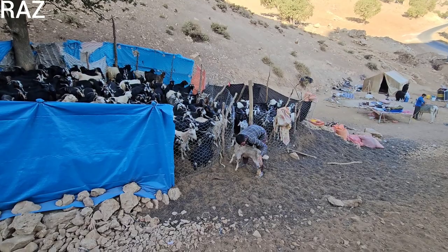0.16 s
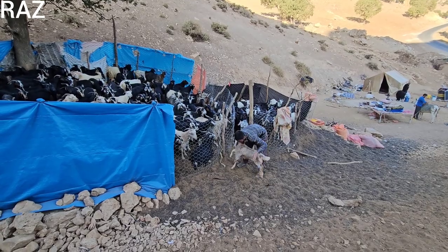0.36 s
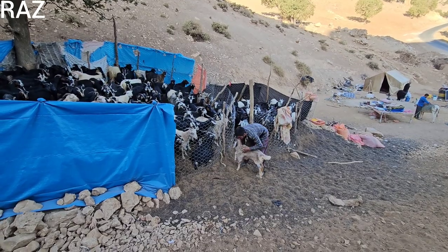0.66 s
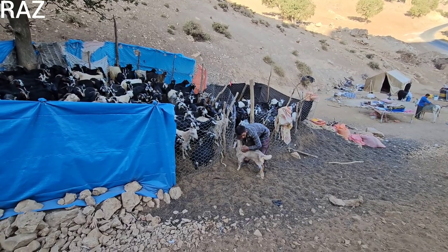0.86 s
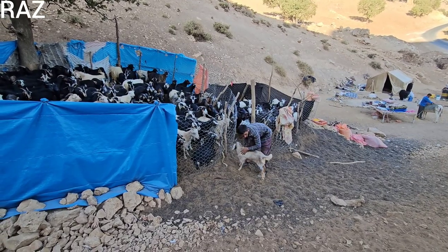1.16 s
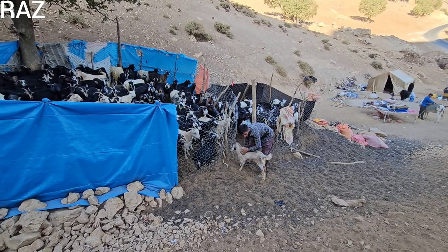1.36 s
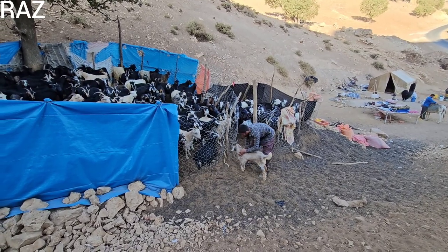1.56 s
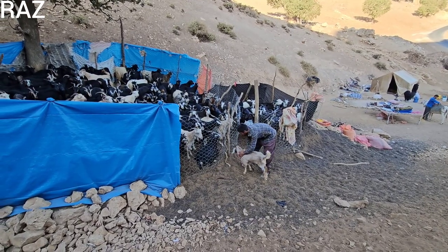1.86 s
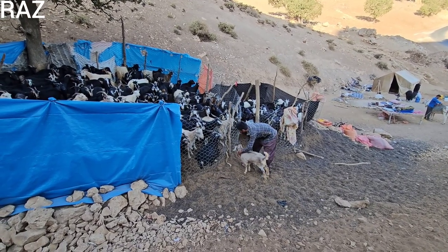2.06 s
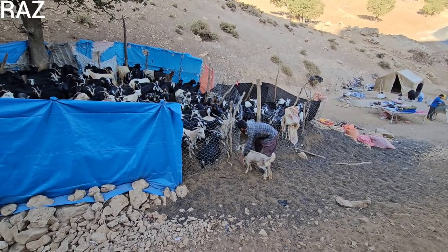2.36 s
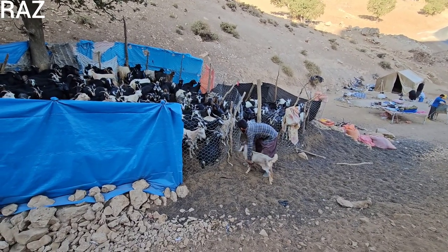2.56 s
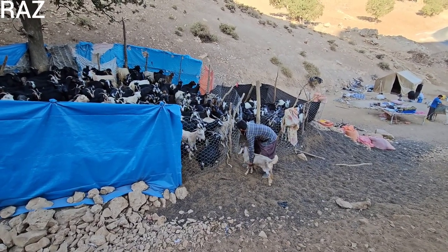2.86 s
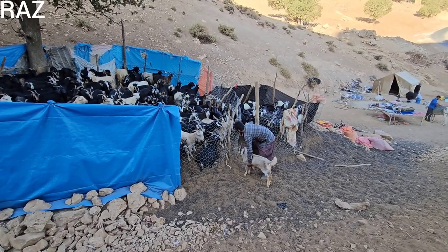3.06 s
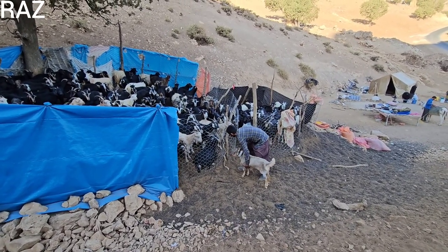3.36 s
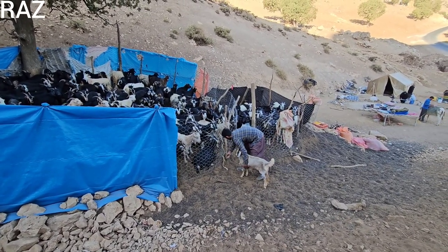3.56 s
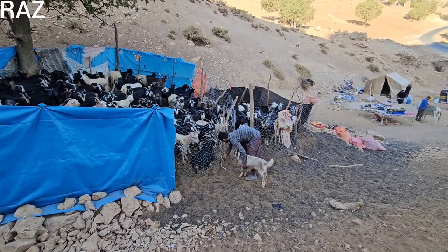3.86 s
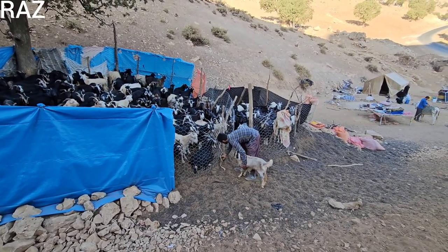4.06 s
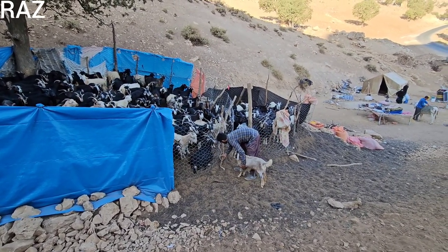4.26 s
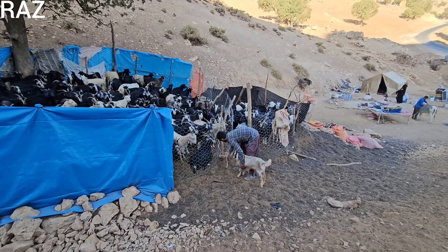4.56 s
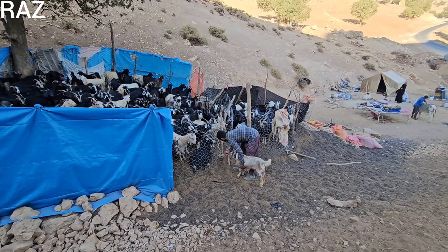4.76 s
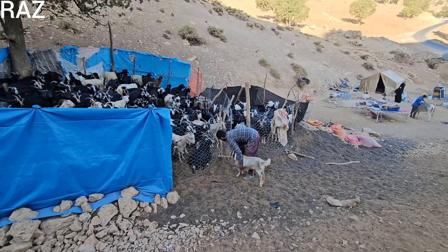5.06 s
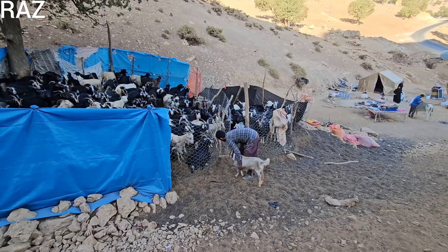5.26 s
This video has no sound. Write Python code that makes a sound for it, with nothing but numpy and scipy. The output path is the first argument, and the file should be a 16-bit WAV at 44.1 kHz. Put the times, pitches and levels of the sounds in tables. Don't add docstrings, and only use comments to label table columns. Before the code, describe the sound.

Outdoor goat pen with low wind rumble: kid bleats briefly then at length, hooves and stones clatter, small bells tinkle, one hoarse bark rings out.

```python
import sys
import numpy as np
from scipy import signal
from scipy.fft import rfft, irfft, next_fast_len
from scipy.io import wavfile
from scipy.ndimage import uniform_filter1d

SR = 44100
rng = np.random.default_rng(int(sys.argv[2]) if len(sys.argv) > 2 else 0)


def transcribe(signal):
    frames = np.atleast_2d(signal).T
    limited = np.clip(frames, -1, 1)
    pcm = np.round(limited * 32767).astype(np.int16)
    wavfile.write(sys.argv[1], SR, pcm)


def rack_gain(trim_db):
    fader = np.asarray(trim_db, float)
    return 10 ** (fader / 20)


N = 237950
T = np.arange(N) / SR
HZ = np.arange(next_fast_len(N) // 2 + 1) * SR / next_fast_len(N)
RIGHT_S, LEFT_S = 0.0003095, -0.00014
LIPS_PART = 0.58


def unit(x):
    return x / np.sqrt(np.mean(x ** 2))


def shape(points, hz):
    f, db = np.transpose(points)
    return np.interp(np.log(hz + 1), np.log(f), db, left=-99, right=-99)


def tint(x, points):
    size = next_fast_len(N)
    return unit(irfft(rfft(x, size) * rack_gain(shape(points, HZ)), size)[:N])


def noise(points):
    return tint(rng.standard_normal(N), points)


def curves(tables, column):
    out = np.full(N, -140.)
    for rows in map(np.array, tables):
        inside = (T >= rows[0, 0]) & (T <= rows[-1, 0])
        out[inside] = np.interp(T[inside], rows[:, 0], rows[:, column])
    return uniform_filter1d(out, size=90)


def walk(rate, size=N):
    k = int(SR / rate)
    held = np.repeat(rng.standard_normal(size // k + 1), k)
    return 1.5 * uniform_filter1d(uniform_filter1d(held, k), k)[:size]


def wobble(hz, depth, rate):
    return np.sin(2 * np.pi * np.cumsum(hz * (1 + depth * walk(rate))) / SR)


def place(x, lag_s, pan_db=0.):
    size = next_fast_len(N)
    late = irfft(rfft(x, size) * np.exp(-2j * np.pi * HZ * lag_s), size)[:N]
    return np.array([late * rack_gain(pan_db / 2), x * rack_gain(-pan_db / 2)])


def ring(hz, t60, size=6000):
    t = T[:size]
    return np.sin(2 * np.pi * hz * t) * 1000. ** (-t / t60)


def add(track, s, sound):
    i = int(s * SR)
    track[..., i:i + sound.shape[-1]] += sound[..., :N - i]


def swells(rows, over):
    power = 0
    for s, half, db, *rel in rows:
        fall = 9 * np.abs((T - s) / half) ** 1.97
        power = power + rack_gain(2 * (db + over * sum(rel) - fall))
    return np.sqrt(power)


def wind():
    # (time [s], level [dB])
    gust_levels = [(0., -59.5), (.19, -48), (.3, -53.5), (.37, -40), (.52, -56), (.6, -42.5), (1.1, -52.5),
                   (1.85, -42), (2., -50.5), (2.07, -42.5), (2.25, -51), (2.61, -54.5), (3.71, -51.5),
                   (4., -57), (4.16, -46.5), (4.26, -51.5), (4.72, -55), (5.4, -56.5)]
    # (frequency [Hz], level per Hz [dB])
    rumble = [(8.8, -36), (15, -6), (38, 1.5), (70, 2), (88, -3), (119, -20), (200, -35), (260, -68),
              (440, -120)]
    air_colour = [(180, -19.5), (300, -23), (418, -8), (722, -6.5), (1010, -23), (1350, -13.5),
                  (1650, -25.5), (2900, -22), (8110, -39.5), (10200, -48.5), (15700, -33.5)]
    # (time [s], half length [s], level [dB])
    shoves = [
        (.17, 0.14, -69.5),
        (1.05, 0.038, -69.5),
        (1.3, 0.022, -65),
        (2.5, 0.11, -72),
        (3.85, 0.21, -68.5),
        (2.78, 0.16, -58.5),
        (3.05, 0.52, -75),
        (4.41, 0.093, -56),
        (5.2, 0.23, -62),
    ]
    gust = place(noise(rumble), RIGHT_S, -4.0) + 0.38 * np.array([noise(rumble), noise(rumble)])
    gust_db = curves([gust_levels], column=1) + 2.5 * walk(7.)
    herd = [(100, 0.5), (150, -6.5), (260, 2.5), (340, -7.5), (420, -26.5)]
    stir = place(noise(herd) * rack_gain(2. * walk(9.7)), 0.) + 0.5 * np.array([noise(herd), noise(herd)])
    tread = np.hypot(rack_gain(-75), swells(shoves, over=0))
    air = 0.23 * place(noise(air_colour), RIGHT_S) + 0.46 * np.array([noise(air_colour), noise(air_colour)])
    return rack_gain(gust_db) * gust + tread * stir + rack_gain(-70.5 + 0.36 * walk(0.92)) * air


def rustle(lag_s, like):
    # (time [s], half length [s], hiss level [dB], sizzle over hiss [dB])
    sheeting = [(.48, 0.038, -77, -15), (2.11, 0.086, -77.5, -11), (2.57, 0.071, -74, -14),
                (2.67, 0.056, -69.5, -10.5), (2.713, 0.01, -55.5, -8.5), (2.775, 0.061, -57.5, -10.5),
                (2.86, 0.078, -75, -12), (3.2, 0.1, -79, -31), (3.4, 0.28, -72, -11.5),
                (3.65, 0.1, -80, -40), (3.96, 0.101, -77.5, -6.5), (4.16, 0.15, -77, -4),
                (4.5, 0.12, -82, -21), (4.94, 0.058, -78, -12), (5.1, 0.15, -70.5, -1.5),
                (5.26, .07, -72, -8.5)]
    # (time [s], half length [s], scrape level [dB], body over scrape [dB])
    scuffs = [(.45, 0.023, -78, -27), (2.05, 0.018, -87, 18), (2.13, 0.053, -75.5, -20),
              (2.6, 0.1, -77, 12.5), (2.66, 0.047, -66.5, -1), (2.755, 0.058, -56.5, 3.5),
              (2.9, 0.095, -80, 7), (3.35, 0.39, -90.5, 7), (3.67, 0.1, -81.5, 5), (3.97, 0.1, -76.5, -8),
              (4.15, 0.27, -74.5, -24.5), (4.37, 0.013, -81, 28.5), (4.49, 0.09, -75.5, 22.5),
              (4.7, 0.12, -72.5, -6), (5.08, 0.27, -76, -1), (5.265, 0.045, -60.5, 0.5)]
    # (frequency [Hz], level per Hz [dB])
    sizzle = [(7500, -21), (8500, 1.5), (10300, 2.5), (11800, 7.5), (16000, -3.5)]
    hiss = [(1530, -39.5), (2600, -17), (2900, -0.5), (3750, -4.5), (4330, 0), (8500, -7.5), (11000, -38),
            (18700, -120)]
    pen_db = [-92.5, -85, -83, -86]
    scrape = [(900, -4.5), (1300, 3.5), (2600, 4.0), (3800, -6.5)]
    body = [(150, -15.5), (400, -6.0), (800, 2.0), (1300, -22.5)]
    moves = [swells(sheeting, over=1), swells(sheeting, over=0), swells(scuffs, over=0), swells(scuffs, over=0.89)]
    calm_db = -6 * (T < 0.57)
    out = 0
    for k, colour in enumerate([sizzle, hiss, scrape, body]):
        grains = [rng.standard_normal(N) * rack_gain(2.4 * walk(60) + 3.6 * walk(400)) for _ in range(3)]
        shared, left, right = (tint(g, colour) for g in grains)
        share = np.clip(like * (1 + 1.11 * k), 0, 1)
        both = np.sqrt(share) * place(shared, lag_s) + np.sqrt(1 - share) * np.array([left, right])
        out = out + np.hypot(moves[k], rack_gain(pen_db[k] + calm_db)) * both
    return out


def clicks():
    # (time [s], peak level [dB], ring [Hz], treble level [dB], left minus right [dB])
    gravel = [(0.4556, -54.5, 4450, -83, 7.5), (0.479, -64, 1960, -63, -2), (.24, -70, 1510, -86.5, 3),
              (0.996, -71, 2510, -95, -2), (1.585, -63, 4410, -96, -9), (4.57, -82.5, 6500, -87, 6),
              (1.3402, -60.5, 2660, -79, -6), (2.0835, -67, 1215, -88, 5), (2.1339, -49.5, 5230, -84, 9.5),
              (2.5251, -53.5, 3610, -56, 6.5), (2.627, -56, 2160, -64, 12), (2.6887, -59.5, 5000, -64, 3),
              (2.7057, -42.5, 3060, -46, 8.5), (2.791, -67, 5440, -77, 16), (2.83, -50.5, 1337, -59, 10),
              (2.8659, -62.5, 4000, -74, 4.5), (3.0244, -73, 1230, -72, 5.5),
              (3.1275, -69.5, 1260, -67.5, -5), (3.338, -65, 6500, -60, 4), (3.43, -64.5, 6550, -66, -1),
              (3.5859, -52.5, 2740, -126, 1.5), (3.705, -62.5, 3900, -75.5, 5.5),
              (4.109, -60, 2720, -70.5, 8), (5.0602, -65, 4230, -76, 5.5), (5.1284, -47, 4320, -65, 10.5),
              (5.266, -58.5, 4500, -68, 9), (5.375, -62, 1540, -65, 11)]
    out, t = np.zeros((2, N)), T[:4000]
    high = signal.butter(2, [5000, 11500], "band", fs=SR, output="sos")
    decay = (np.exp(-t / 0.0052) + 0.22 * np.exp(-t / 0.029)) * np.minimum(t / .0007, 1)
    for s, db, hz, treble_db, pan_db in gravel:
        burst = rng.standard_normal((2, len(t))) * decay
        burst[1] = .5 * np.roll(burst[0], 5) + 2.42 * burst[1]
        mid = signal.butter(2, [0.48 * hz, 1.73 * hz], "band", fs=SR, output="sos")
        click = rack_gain(db) * (signal.sosfilt(mid, burst) + 0.27 * ring(hz, 0.055, size=len(t)))
        click = click + rack_gain(treble_db - 7.5) * signal.sosfilt(high, burst)
        add(out, s, click * rack_gain(np.array([[pan_db], [-pan_db]]) / 2))
    return out


def mouth_levels(opening):
    # (time [s], level [dB])
    crack = [(1.503, -100), (1.514, -50), (1.526, -65), (1.625, -62.5), (1.73, -80.5)]
    # (time [s], level [dB])
    sheen_levels = [(1.508, -100), (1.525, -62), (1.6, -68), (1.66, -74), (1.74, -91)]
    shut = np.maximum(LIPS_PART - opening, 0)
    mouth = -59.5 - 62.5 * shut + 9 * np.maximum(opening - LIPS_PART, 0)
    flutter = 2.8 * np.clip((T - crack[3][0]) * 10, 0, 1) * wobble(92, 0.12, 13)
    front = -58 - 43.5 * (1 - opening) - 8 * np.minimum(10 * shut, 1) + flutter
    strain = np.maximum(-83 - 45 * (1 - opening), curves([crack], column=1))
    return mouth, front, strain, curves([sheen_levels], column=1)


def throat_db(f, t, jaw, levels, open_s):
    # (frequency [Hz], level [dB])
    throat_open = [(900, -7), (1090, -7), (1250, 0), (1400, 0), (1750, -14), (1960, -14), (2160, 0),
                   (3350, -5), (3600, -15), (3900, -16), (4250, -15), (4550, -11), (5200, -22), (6950, -1),
                   (8700, -24), (9450, -13), (10150, -30), (10950, -5), (11500, -28), (12300, -24),
                   (12900, -15), (13700, -22), (14400, -40)]
    throat_shut = [(850, -5), (1200, 1), (1500, -7.5), (1800, 0.5), (2100, -7.5), (2500, -30)]
    # (time [s], centre [Hz], depth [dB])
    nasal = [(.92, 2780, 24), (1., 2830, 5), (1.08, 3430, 0), (1.13, 3720, 17), (1.45, 4060, 20),
             (1.52, 4120, -2), (1.6, 3960, 2), (1.7, 3705, 8)]
    mouth, front, strain, sheen = levels
    db = mouth + np.clip((f - 1900) / 300, 0, 1) * (front - mouth)
    db = db + np.clip((f - 5000) / 900, 0, 1) * (strain - front)
    db = db + np.clip((f - 8000) / 600, 0, 1) * (sheen - strain)
    notch_s, notch_hz, notch_db = np.transpose(nasal)
    off_notch = (f - np.interp(t, notch_s, notch_hz)) / 220
    db = db + shape(throat_open, f / jaw) - np.interp(t, notch_s, notch_db) * np.exp(-off_notch ** 2)
    return np.where(t < open_s, mouth + shape(throat_shut, f), db)


def goat():
    # (time [s], pitch [Hz], fundamental level [dB], mouth opening [0-1])
    calls = [
        [(.32, 505.5, -60.5, 0.45), (.342, 581, -63, 0.48), (.375, 545, -71, 0), (.392, 487, -49.5, 0.4),
         (.407, 622, -52.5, 0.56), (.45, 522.5, -47.5, 0.43), (.52, 519, -47, 0.34), (.55, 439, -52, 0.43),
         (.57, 457, -80, 0)],
        [(.697, 480, -62, 0.49), (.724, 495, -46, 0.2), (.77, 494, -45, 0.1), (.793, 471.7, -51.5, 0.19),
         (.85, 514, -42.5, 0.35), (.892, 621, -46.5, 0.47), (.915, 603, -55.5, 0.43)],
        [(.915, 559, -45, 0.8), (.99, 560, -49, 0.78), (1.12, 617.5, -50.5, 0.91), (1.5, 684, -52.5, 0.94),
         (1.62, 662.5, -52, 1.), (1.786, 584.4, -51.5, 0.92), (1.89, 559.4, -47.5, 0.86),
         (2.003, 488, -45.5, 0.52), (2.04, 487.3, -81, 0.)],
    ]
    # (time [s], share of smeared voice [0-1])
    hoarse_share = [(.3, .2), (.55, .22), (.6, .6), (.7, .7), (.74, .3), (.9, .15), (.95, .035),
                    (1.62, .03), (1.75, .08), (1.9, .1), (1.94, .3), (2.05, .45)]
    # (time [s], level [dB])
    half_levels = [(1.51, -100), (1.53, -79), (1.66, -76), (1.76, -72), (1.88, -82), (1.95, -100)]
    # (frequency [Hz], level per Hz [dB])
    rasp_shut = [(300, -23), (550, 4), (800, -11), (1100, -19), (1600, -18.5), (2100, -12), (2500, -49)]
    rasp_open = [(400, 8), (1000, 6), (1400, 0), (1750, -16), (2400, 6), (2900, -6), (3350, -8), (3650, 13),
                 (3950, 2), (4300, -26), (6700, -26), (7250, -1), (7800, -10), (8200, -34), (9000, -22),
                 (9700, -36), (10600, -22), (11300, -40)]
    rows = np.concatenate(calls)
    hoarse = np.interp(T, *np.transpose(hoarse_share))
    tune = np.interp(T, rows[:, 0], rows[:, 1])
    tremble = .04 * (T > .43) * (T < .56) * np.sin(2 * np.pi * 38 * T)
    hz = tune * (1 + .005 * walk(110) + .003 * walk(25) + .06 * hoarse * walk(70) + tremble)
    phase = 2 * np.pi * np.cumsum(hz) / SR
    first = curves(calls, column=2) + 1.1 * walk(18.)
    opening = curves(calls, column=3)
    voice = rack_gain(first + (.8 + 5. * hoarse) * walk(80)) * np.sin(phase)

    half_db = curves([half_levels], column=1)
    for k in np.arange(3.5, 8):
        voice += rack_gain(half_db - 9.7 * ((k * hz - 3650) / 450) ** 2) * np.sin(k * phase)

    live = slice(int(.3 * SR), int(2.1 * SR))
    levels = [level[live] for level in mouth_levels(opening)]
    jaw = np.maximum.accumulate(np.where(opening > LIPS_PART, tune, 560))[live] / 650
    for k in range(2, 26):
        f = k * hz[live]
        db = throat_db(f, T[live], jaw, levels, open_s=calls[2][0][0])
        db = db + 0.63 * walk(15.2, size=len(f)) + 0.9 * walk(100, size=len(f))
        scatter = hoarse[live] * .8 * np.sqrt(k) + np.minimum(.06 + .008 * k + .0014 * k * k, .22)
        scatter = np.clip(scatter, 0, 1)
        smear = scatter * unit(walk(1100, size=len(f)))
        line = np.sin(k * phase[live] + 0.76 * k * k)
        voice[live] += rack_gain(db) * (np.sqrt(1 - scatter ** 2) + smear) * line

    rasp = np.where(T < 1, rack_gain(-7 + 4 * walk(50)) * noise(rasp_shut), rack_gain(-1.5) * noise(rasp_open))
    rasp = rasp * (1 + .5 * np.sin(phase))
    return np.sqrt(2) * voice + rack_gain(first) * np.clip(hoarse - .07, .015, 1) * rasp


def bird():
    # (time [s], level [dB], start [Hz], end [Hz], length [s])
    chirps = [
        (0.525, -68, 653, 646, 0.1),
        (4.727, -68, 1910, 2500, 0.058),
        (4.961, -69.5, 1750, 2710, 0.095),
        (5.262, -61, 2280, 2520, 0.025),
    ]
    out = np.zeros(N)
    for s, db, from_hz, to_hz, length in chirps:
        n = int(length * SR)
        glide = 2 * np.pi * np.cumsum(np.linspace(from_hz, to_hz, n)) / SR
        add(out, s, rack_gain(db) * np.hanning(n) * np.sin(glide))
    return out


def knocks():
    # (time [s], level [dB],
    # pitch [Hz], length [s])
    thuds = [(0.687, -60, 657, 0.031), (1.029, -62.5, 822, 0.039), (1.03, -66, 326, 0.048),
             (1.136, -60.5, 779, 0.058), (1.137, -57, 162, 0.058), (1.149, -59, 860, 0.028),
             (1.299, -62, 257.7, 0.056), (2.532, -65, 1093, 0.028), (2.66, -57.5, 700, 0.027),
             (2.697, -52, 678, 0.024), (2.731, -44.5, 138.6, 0.044), (2.755, -45, 253, 0.023),
             (2.78, -40, 146, 0.017), (2.788, -46, 255, 0.019), (2.826, -42.5, 161, 0.018),
             (4.31, -54, 170, 0.072)]
    # (time [s], peak level [dB], ring [Hz], upper ring level [dB], upper ring [Hz])
    stones = [(2.136, -35.5, 688, -30, 2780), (2.644, -41, 640, -40, 3220), (2.739, -34.5, 650, -27, 4400),
              (2.749, -39, 2230, -45, 3000), (2.799, -65, 1100, -42, 5900), (2.813, -57, 4300, -33, 5200),
              (5.128, -45, 2020, -35, 3000), (2.766, -39, 765, -38, 4400), (5.201, -47.5, 1260, -38, 2940),
              (5.233, -40, 1310, -30, 3870), (5.25, -38.5, 1240, -27.5, 3380),
              (5.257, -32.5, 1270, -82, 3390), (5.277, -32.5, 1410, -30.5, 3380),
              (5.29, -39.5, 850, -34, 3330), (5.298, -44.5, 1770, -64, 3370),
              (5.319, -43.5, 650, -71, 2980)]
    out, contact = np.zeros(N), np.minimum(T[:6000] / 0.0012, 1)
    for s, db, hz, length in thuds:
        n = int(length * SR)
        add(out, s, rack_gain(db) * np.hanning(n) * np.sin(2 * np.pi * hz * T[:n]))
    for s, db, hz, top_db, top_hz in stones:
        low = ring(hz, 0.014) + 0.87 * ring(0.51 * hz, 0.0075) + .5 * ring(1.37 * hz, 0.0064)
        add(out, s, contact * (rack_gain(db) * low + rack_gain(top_db + 1.0) * ring(top_hz, 0.003)))
    return out


def bells():
    # (time [s], peak level [dB], pitch [Hz], upper modes level [dB], t60 [s])
    strikes = [
        (2.228, -65.5, 2840, -80, 0.21),
        (2.319, -62, 2846, -71.5, 0.19),
        (3.912, -62.5, 2930, -77, .05),
        (3.926, -63, 2830, -70, 0.1),
        (4.0335, -62.5, 2870, -76, 0.076),
        (4.113, -56, 2830, -68, 0.038),
        (4.192, -59, 2870, -64.5, 0.14),
        (4.3096, -66.5, 2860, -80, .035),
        (5.1434, -56.5, 2820, -70, 0.11),
        (5.333, -59.5, 2850, -81, 0.081),
    ]
    # (frequency [Hz], level [dB], t60 [s])
    bell_top = [(8130, -3, .2), (8180, -5, .2), (8630, -5, .16)]
    out, contact = np.zeros(N), np.minimum(T[:12000] / .003, 1)
    for s, db, hz, top_db, ring_s in strikes:
        strike = 0
        for tune, share in [(.995, 1.2), (1.008, .85), (.975, .35)]:
            strike = strike + rack_gain(db) * share * ring(hz * tune, ring_s * rng.uniform(.7, 1.1), size=12000)
        for top_hz, mode_db, t60 in bell_top:
            strike = strike + rack_gain(top_db + mode_db) * ring(top_hz, t60, size=12000)
        add(out, s, contact * strike)
    return out


def bark():
    # (start [Hz], end [Hz], width [Hz], level [dB], head start [dB])
    resonances = [(410, 462, 50, 0, 11), (620, 660, 140, -8, -6), (960, 995, 55, -3, -22),
                  (1250, 1250, 160, -11, -18), (1600, 1460, 130, -7, -10), (1900, 1990, 150, -18, -10),
                  (2920, 2920, 250, 3, 0), (3450, 3450, 200, -3, 0), (4850, 4800, 300, -4, 0),
                  (5300, 5400, 350, -1, 0)]
    # (frequency [Hz], level per Hz [dB])
    valley = [(200, -14.5), (450, -5), (750, -16.5), (1000, -1), (1300, -4.5), (2100, -15), (2500, -42),
              (4000, -36)]
    # (frequency [Hz], level [dB], t60 [s])
    ring_on = [
        (463, -74, .6),
        (1001, -71, 2.4),
    ]
    bark_s, hold_s, chest_stops_s = 4.44, .042, 4.48
    jaw, early = np.clip((T - 4.34) / .1, 0, 1) ** .6, np.clip((4.4 - T) / .05, 0, 1)
    chest_db = -500 * np.clip(T - chest_stops_s, 0, .03)
    wheeze_db = 8 * np.clip((T - chest_stops_s) / 0.081, 0, 1)
    low, top = 0, 0
    for from_hz, to_hz, width, db, early_db in resonances:
        drift = 2 * np.pi * np.cumsum(from_hz + jaw * (to_hz - from_hz) + .3 * width * walk(60)) / SR
        peak = rack_gain(db + early * early_db) * (1.3 + walk(4.5 * width)) * np.sin(drift)
        peak = peak * rack_gain(chest_db * (to_hz < 700) + wheeze_db * (to_hz > 5000))
        if to_hz < 2400:
            low = low + peak
        else:
            top = top + peak
    hoarse = rack_gain(-6 - 6 * early) * noise([(200, -22), (330, -2), (1200, 0), (1800, -14), (2600, -36)])
    throat = low / np.std(low[T > 4.4]) + hoarse + rack_gain(-31 - 28 * early) * unit(top)

    push = -38 - 480 * np.maximum(bark_s - hold_s - T, 0) - 305 * np.maximum(T - bark_s - hold_s, 0)
    push += 2. * wobble(62, .25, 40)
    linger = np.where(T > bark_s, -63.5 - 56 * np.maximum(T - 4.75, 0), -140)
    out = rack_gain(uniform_filter1d(linger, size=2000) + 1.7 * walk(25)) * noise(valley)
    out = out + rack_gain(push + 0.67 * walk(70)) * throat
    for hz, db, t60 in ring_on:
        add(out, 4.47, rack_gain(db) * (.8 + walk(70, size=30000)) * ring(hz, t60, size=30000))
    return out


def echo(x, t60, db):
    t = T[:int(t60 * SR)]
    tails = rng.standard_normal((2, len(t))) * 1000. ** (-t / t60) * (t > .004)
    tails = tails / np.sqrt(np.sum(tails[0] ** 2))
    return rack_gain(db) * signal.fftconvolve(x[None], tails, axes=1)[:, :N]


def scene():
    kid, chimes, stones, cough = goat(), bells() + bird(), knocks(), bark()
    near = place(kid, RIGHT_S, -5.0) + place(cough, RIGHT_S * 1.174, 2.86)
    near = near + place(stones, LEFT_S / 2, 0.58) + place(chimes, .00004, -0.54)
    echoes = echo(kid + stones + chimes, .2, -15) + echo(cough, .3, -15)
    return wind() + rustle(LEFT_S, 0.13) + clicks() + near + echoes


def top_cut(x):
    return signal.sosfilt(signal.butter(12, 15880, fs=SR, output="sos"), x)


def record(dry):
    return top_cut(dry)


dry = scene()
out = record(dry)
transcribe(out)
```